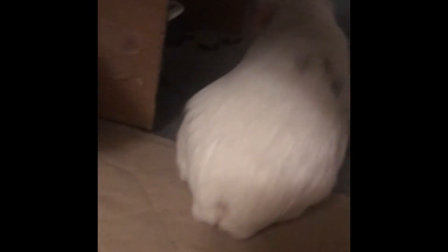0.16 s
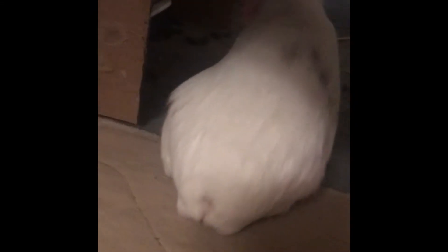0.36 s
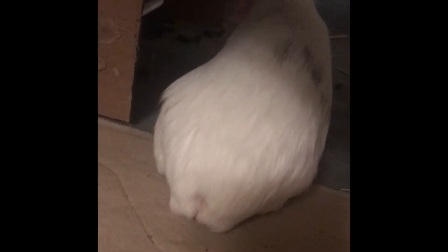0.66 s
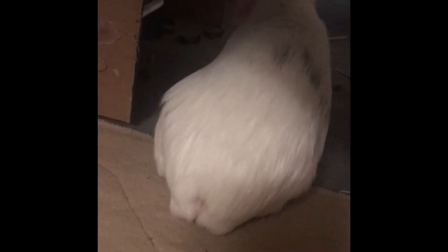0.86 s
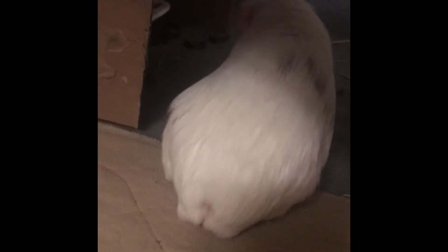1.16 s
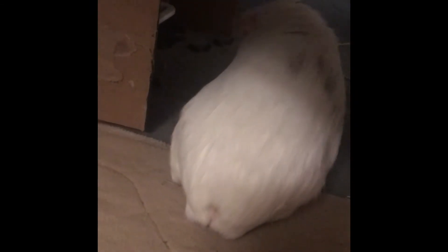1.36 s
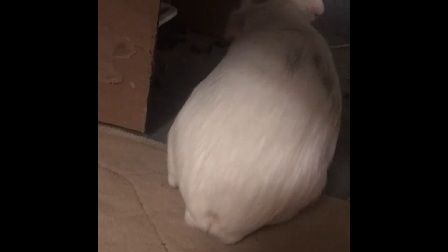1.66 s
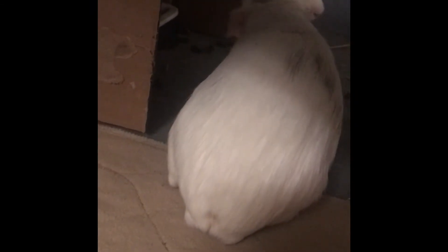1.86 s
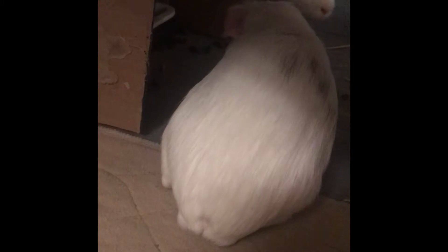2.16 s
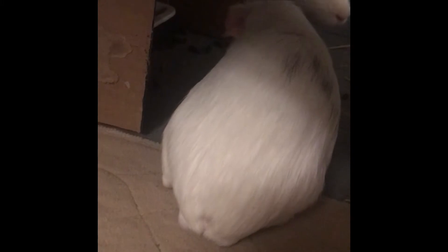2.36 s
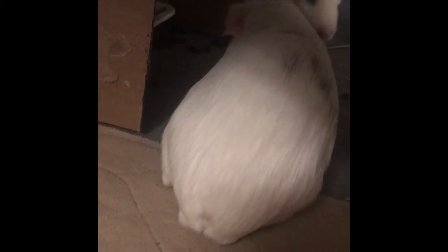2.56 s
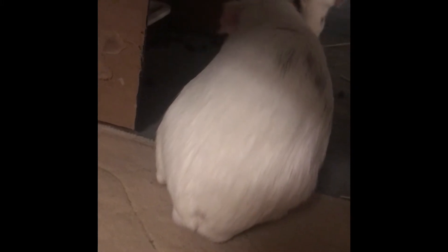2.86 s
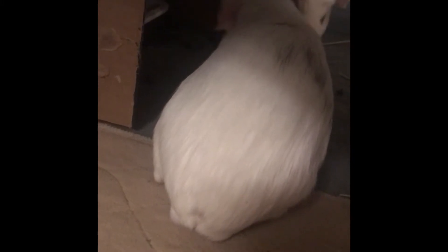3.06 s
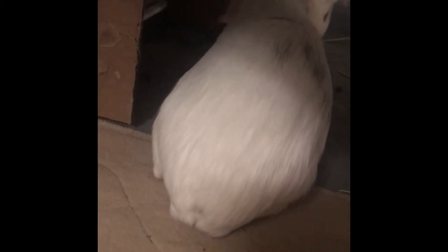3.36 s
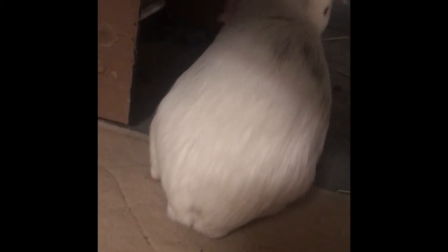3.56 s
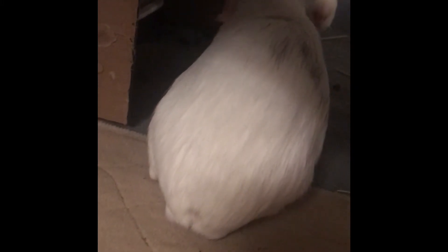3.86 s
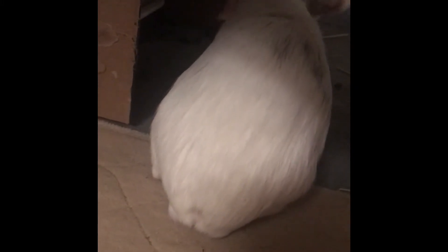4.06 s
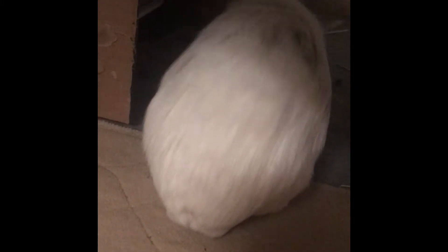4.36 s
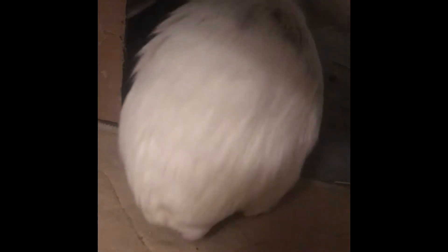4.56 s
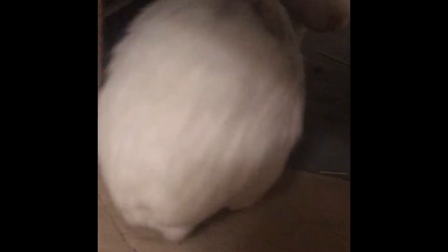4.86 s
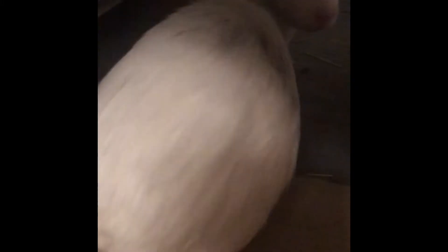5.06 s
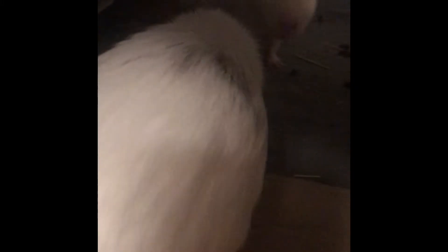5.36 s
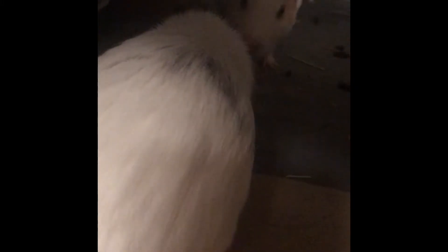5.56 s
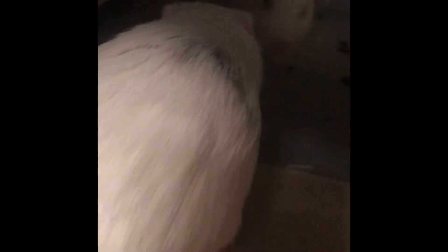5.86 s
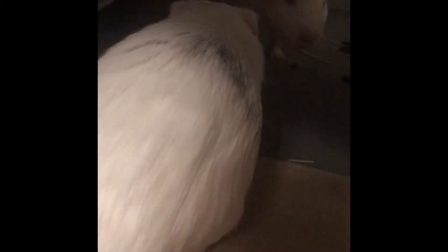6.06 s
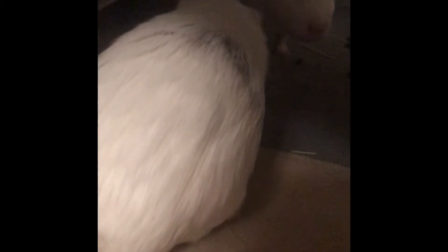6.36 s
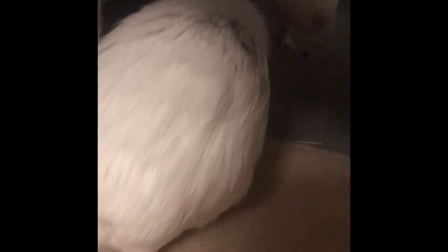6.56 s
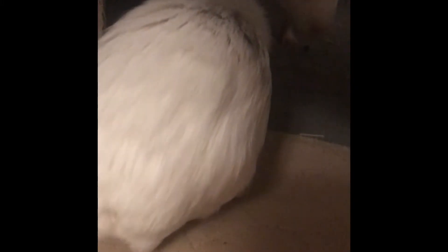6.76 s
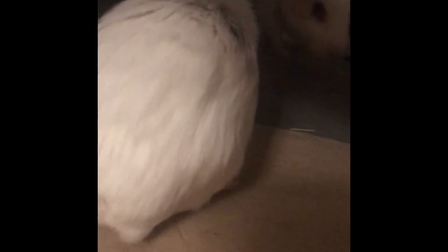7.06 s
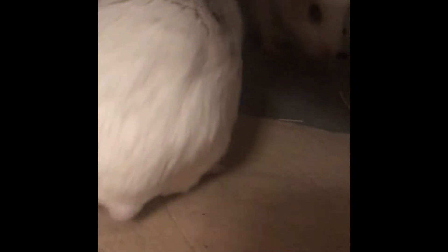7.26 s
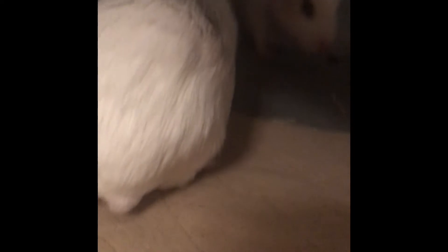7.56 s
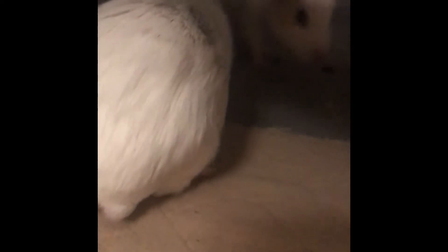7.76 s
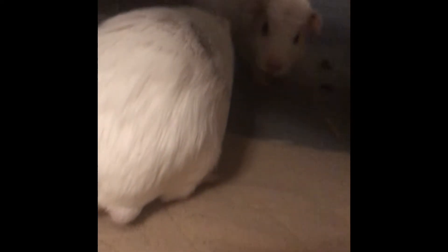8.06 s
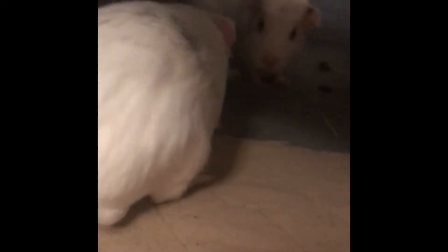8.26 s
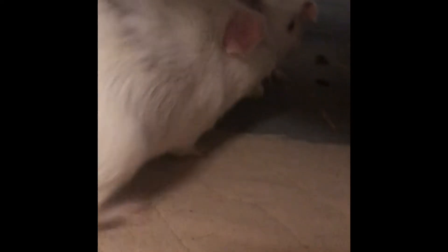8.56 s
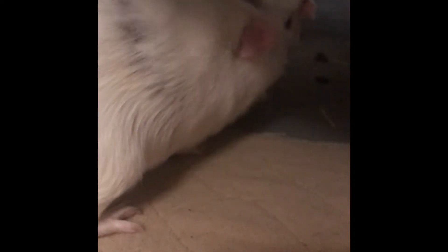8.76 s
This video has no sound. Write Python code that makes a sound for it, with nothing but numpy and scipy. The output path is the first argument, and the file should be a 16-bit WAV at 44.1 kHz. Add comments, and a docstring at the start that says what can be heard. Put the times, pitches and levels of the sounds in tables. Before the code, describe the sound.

Close rat squeaks, low whines cracking into high wavering whistles, repeat over scuffing feet, small clicks and soft fur brushes in a quiet room.

```python
"""Two pet rats on a sheet of cardboard in a small room; one protests in a long run of squeaks.
A quiet rumble and tiny fidgets run throughout; a soft peep comes first, then scuffing feet.
The squeaks begin: most start as a low clear whine, crack into a rasp and slide up thin and high.
Claws tick and paws thump between them, some calls waver on in a whistle, and later fur brushes past.
Calls are pulses ringing in a throat, paw blows ring damped modes, the rest is shaped noise."""
import sys
import numpy as np
from scipy import signal
from scipy.fft import rfft, irfft, next_fast_len
from scipy.io import wavfile
from scipy.ndimage import uniform_filter1d

SR = 44100
rng = np.random.default_rng(int(sys.argv[2]) if len(sys.argv) > 2 else 0)


def inscribe(sig):
    """Save sig as 16-bit PCM at rate SR to the path in sys.argv[1].

    A 1-D sig is mono; a 2-D sig holds one channel per row.
    Samples are clipped to [-1, 1] before scaling.
    """
    pcm = np.round(np.clip(np.atleast_2d(sig).T, -1, 1) * 32767)
    wavfile.write(sys.argv[1], SR, pcm.astype(np.int16))


N = 392931
TIME = np.arange(N) / SR
CUTOFF_HZ = 15900   # top of the sound


def from_db(db):
    """Decibels to gain."""
    return 10 ** (np.asarray(db) / 20)


def rms_one(x):
    """Scale to unit power."""
    return x / np.sqrt(np.mean(x ** 2) + 1e-20)


def soften(x, seconds):
    """Round off corners with two running means."""
    size = max(int(seconds * SR), 1)
    return uniform_filter1d(uniform_filter1d(x, size), size)


def coloured(x, spectrum):
    """Causal (minimum-phase) filter that follows a list of (Hz, dB)."""
    size = 2 * next_fast_len(N // 2 + SR // 10)
    hz, db = np.transpose(spectrum)
    bins = np.maximum(np.arange(size // 2 + 1) * SR / size, 1)
    gain = from_db(np.interp(np.log(bins), np.log(hz), db))
    # fold the cepstrum onto positive time, so that nothing rings before its cause
    cepstrum = irfft(np.log(gain))
    cepstrum[1:size // 2] *= 2
    cepstrum[size // 2 + 1:] = 0
    return irfft(np.exp(rfft(cepstrum)) * rfft(x, size))[:N]


def noise(spectrum):
    """Noise of a given colour, rms 1."""
    return rms_one(coloured(rng.standard_normal(N), spectrum))


def wobble(hz):
    """Random motion, mostly slower than hz, rms 1."""
    lowpass = signal.butter(2, hz, fs=SR, output="sos")
    return rms_one(signal.sosfilt(lowpass, rng.standard_normal(N)))


def impulses(times, levels_db):
    """A single click at each time."""
    hits = np.zeros(N)
    hits[(times * SR).astype(int)] = from_db(levels_db)
    return hits + 1e-18   # the tiny offset keeps the decaying filters fast


def bursts(times, levels_db, fade_s):
    """Envelope that jumps at each time and dies away exponentially."""
    return signal.lfilter([1], [1, -np.exp(-1 / (fade_s * SR))], impulses(times, levels_db))


def strike(times, levels_db, modes, contact_s, spread_db=2):
    """Soft blows set each mode ringing with a strength of its own."""
    out = np.zeros(N)
    for k, (hz, db, t60) in enumerate(modes):
        strengths_db = levels_db + db + spread_db * rng.standard_normal(len(times))
        decay = from_db(-60 / (t60 * SR))
        angle = 2 * np.pi * hz / SR
        resonator = [0, np.sin(angle)], [1, -2 * decay * np.cos(angle), decay * decay]
        out += (-1) ** k * signal.lfilter(*resonator, impulses(times, strengths_db))
    return soften(out, contact_s)


def glide(t, s, y):
    """Smooth curve through the points (s, y) that never overshoots them."""
    slope = np.diff(y) / np.diff(s)
    a, b = slope[:-1], slope[1:]
    # flat at each turning point, elsewhere the harmonic mean of the slopes on both sides
    inner = np.where(a * b > 0, 2 * a * b / (a + b + 1e-9), 0)
    tangent = np.r_[slope[0], inner, slope[-1]]
    i = np.clip(np.searchsorted(s, t) - 1, 0, len(slope) - 1)
    u = (t - s[i]) / np.diff(s)[i]
    bend = (1 - u) * (tangent[i] - slope[i]) - u * (tangent[i + 1] - slope[i])
    return y[i] + (t - s[i]) * (slope[i] + (1 - u) * bend)


def samples(start, length):
    """The samples of an event, and the time since it began."""
    span = np.arange(int(start * SR), min(int((start + length) * SR), N))
    return span, (span - span[0]) / SR


def progress(t, start, length):
    """Goes from 0 to 1 over a stretch of time."""
    return np.clip((t - start) / max(length, 1e-4), 0, 1)


def swell(start, length):
    """Envelope of a stroke: it rises and falls as half a sine."""
    return np.sin(np.pi * progress(TIME, start, length))


# Colour of the room's background. Each row: frequency in Hz, relative density in dB per Hz.
ROOM_AIR = [(20, -13), (55, 2.5), (130, -2), (300, -10.5), (500, -14), (900, -17), (1300, -14.5),
            (2200, -24.5), (3000, -21.5), (5000, -27), (10400, -30)]


def room_air(level_db=-64):
    """Steady noise, heaviest in the bass: the quiet rumble of the room with a little hiss."""
    return from_db(level_db) * noise(ROOM_AIR)


# Colour of scraped cardboard. Each row: frequency in Hz, relative density in dB per Hz.
SCRAPE = [(300, -28), (600, 2.5), (1200, 6), (2200, -3), (6500, -2.5), (10000, -14), (16000, -15)]
# Colour of the shaken sheet. Each row: frequency in Hz, relative density in dB per Hz.
RUMBLE = [(20, -40.5), (55, 8.5), (90, 1), (200, -8.5), (380, -10.5), (900, -55)]


def fidgets(count=45, level_db=-72, range_db=7, thud_db=4):
    """Small shifts of weight give faint scratches and thuds all along."""
    s = rng.uniform(0, TIME[-1], count)
    db = level_db + range_db * rng.random(count)
    scratch = soften(bursts(s, db, fade_s=0.0063), .002) * noise(SCRAPE)
    thud = soften(bursts(s, db + thud_db, fade_s=0.051), 0.007) * noise(RUMBLE)
    return scratch + thud


# Short soft peeps. Each row: start in seconds, length in seconds, first, middle and last pitch in Hz,
# level in dB, rasp from 0 to 1.
PEEPS = [(0.285, 0.061, 773, 718.6, 652, -47, 0.14), (.352, 0.022, 1298, 1081, 883, -47, 0.3),
         (0.611, .034, 1150, 1102, 1287, -45, 0.54), (1.237, 0.056, 670, 641, 672, -48, 0.2),
         (1.3, 0.022, 1030, 852, 772, -48.5, 0.23), (5.736, .019, 1924, 2729, 3310, -46, 0.3),
         (7.083, 0.015, 2249, 1800, 1553, -47, 0.21), (7.109, .015, 2350, 2780, 3120, -63.5, 0.01)]


def peep(start, length, first_hz, middle_hz, last_hz, db, roughness):
    """One small arc of pitch at an even level."""
    span, t = samples(start, length)
    hz = glide(t / length, np.array([0, .5, 1]), np.array([first_hz, middle_hz, last_hz]))
    return span, hz, from_db(db), 0, roughness


CRACK_TOP_HZ = 2520   # above this pitch the voice is a clean whistle again


def voice_controls(edge_s=.0025):
    """Pitch, loudness, pulse alternation and rasp at every sample; one voice makes all the calls."""
    pitch, loudness, doubling, rasp = np.zeros((4, N))
    calls = [squeak(*row) for row in SQUEAKS]
    calls += [wavering_stretch(*row) for row in WAVERING]
    calls += [peep(*row) for row in PEEPS]
    for span, *controls in calls:
        pitch[span], loudness[span], doubling[span], rasp[span] = controls
    # bridge the silences so that the pitch never jumps to zero
    pitch = np.interp(TIME, TIME[pitch > 0], pitch[pitch > 0])
    can_crack = pitch < CRACK_TOP_HZ
    return [soften(control, edge_s) for control in (pitch, loudness, doubling * can_crack, rasp * can_crack)]


# Resonance of throat and mouth. Each row: frequency in Hz, gain in dB.
THROAT = [(280, 3), (450, -1), (660, 0), (900, -2), (1220, 5), (1450, -0.5), (1720, -8.5), (2080, -11),
          (2300, -17.5), (2600, -14.5), (3560, -23.5), (4100, -47), (5000, -50), (6000, -39.5),
          (7400, -48.5), (10000, -55)]
# Brightness of the voice over time. Each row: time in seconds, gain of its upper overtones in dB.
BRIGHTNESS = [(4.4, -2), (5.2, -5.5), (6.05, -3), (7, -4.5), (8.2, -2)]


def fold_pulses(phase, pitch, loudness, firm_db=-38, dulling=0.066, flicker_db=3.5):
    """One pulse a cycle; pushed gently, the folds close softly and the overtones fade."""
    hz, db = np.transpose(THROAT)
    # effort is the loudness without the help of the throat
    effort_db = 20 * np.log10(loudness + 1e-6) - np.interp(pitch, hz, db)
    softness = dulling * np.maximum(firm_db - effort_db, 0)
    brightness_db = np.interp(TIME, *np.transpose(BRIGHTNESS))
    pulses = np.cos(phase)
    for k in range(2, 15):
        overtone_db = brightness_db * (k > 2) + flicker_db * wobble(30)
        weight = np.exp(-softness * (k - 1)) * from_db(overtone_db)
        pulses = pulses + weight * np.cos(k * phase) * (k * pitch < CUTOFF_HZ)
    return pulses


# Hiss of air forced through the mouth. Each row: frequency in Hz, relative density in dB per Hz.
MOUTH_HISS = [(1500, 0.5), (3100, 16), (4200, -34), (5000, -34), (5800, 8.5), (7400, 1), (8300, -12.5),
              (15000, -19)]
TRIPLE_HZ = 1456   # above this pitch a cracked voice groups its pulses in threes instead of pairs


def rat_voice(rasp_shimmer=0.7, rasp_air=0.2, clear_air=0.0023, flutter_db=4, sputter_db=4,
              crack_swing_db=3, hiss_db=-34, strain_hz=1400, level_db=1.43):
    """Vocal-fold pulses ring in the throat; in a crack they bunch, sputter and lose their timing."""
    pitch, loudness, doubling, rasp = voice_controls()
    strain = pitch / strain_hz   # tight folds are less steady and leak more air
    jitter = .008 * wobble(70) + (.008 * strain + .13 * rasp) * wobble(280)
    pitch = pitch * (1 + jitter)
    phase = 2 * np.pi * np.cumsum(pitch) / SR

    # every second or third pulse differs in strength and timing
    in_threes = soften((pitch > TRIPLE_HZ).astype(float), .002)
    grouping = (1 - in_threes) * np.cos(phase / 2) + in_threes * np.cos(phase / 3)
    alternation = doubling * from_db(crack_swing_db * wobble(36)) * grouping
    phase = phase + .7 * alternation
    pulses = fold_pulses(phase, pitch, loudness)
    strength = 1 + alternation + rasp_shimmer * rasp * wobble(540)

    # air hisses through the folds while they are open
    opening = 1 + np.cos(phase)
    air = (clear_air + rasp_air * rasp) * opening * rng.standard_normal(N)
    voice = coloured(pulses * strength + air, THROAT)

    # even out the level, then let the rasp flutter and sputter
    voice = voice / np.sqrt(soften(voice ** 2, 0.0076) + 1e-12)
    voice = voice * from_db(rasp * (flutter_db * wobble(270) + sputter_db * wobble(80)))
    hiss = from_db(hiss_db) * strain * (1 + 2 * rasp) * opening * noise(MOUTH_HISS)
    return from_db(level_db) * loudness * (voice + hiss)


# Feet scuffing the cardboard. Each row: start in seconds, length in seconds, scrape level in dB,
# rumble level in dB.
SCUFFS = [(0.378, 0.21, -50.5, -46.5), (0.566, 0.15, -50.5, -44.5), (0.67, 0.18, -68, -57),
          (0.831, 0.11, -61, -53), (0.893, 0.38, -61, -55), (1.211, 0.25, -71, -58),
          (1.515, 0.2, -81, -50.5)]


def scuffle(grain_db=5):
    """Sliding feet scrape in grains and shake the sheet."""
    scrape = sum(from_db(db) * swell(start, length) for start, length, db, _ in SCUFFS)
    rumble = sum(from_db(db) * swell(start, length) for start, length, _, db in SCUFFS)
    grainy = rms_one(noise(SCRAPE) * from_db(grain_db * wobble(83)))
    return scrape * grainy + rumble * noise(RUMBLE)


# Squeaks. Each row: start, fall, climb and slide in seconds, onset, lowest and end pitch in Hz,
# lateness of the climb as an exponent, waver in octaves, effort in the whine, at the break and at the
# end in dB, time until the crack in seconds, long-short pulse alternation from 0 to 1, rasp from 0 to 1.
SQUEAKS = [ (.417, 0.029, 0.069, 0.0043, 780.3, 708, 1220, 1.83, 0, -46, -47.5, -53, .055, 0.03, 0.32),
           (0.832, 0.014, 0.054, 0.014, 700, 695.6, 1153, 16.6, 0, -43, -49.5, -61, 0.048, 0.12, 0.67),
           (0.962, .02, 0.038, 0.024, 725, 714, 850, 12, 0, -45.5, -48, -50, 0.0075, 0.12, .2),
           (1.59, 0.029, 0.068, 0.017, 780, 704, 1710, 1.7, 0.033, -39.5, -39, -36, .2, 0.05, 0.01),
           (2.018, 0.0088, 0.088, 0.044, 679, 645, 1746, 3.03, 0.3, -39, -41, -38.5, 0.13, 0.1, 0.34),
           (2.572, 0.021, 0.059, 0.024, 690, 640.4, 1800, 7.8, 0.2, -38, -39.5, -45, 0.061, 0.08, 0.14),
           (2.84, 0.049, .014, 0.013, 1405, 703, 2050, 2.64, 0.0097, -37.5, -39, -33, 0.12, 0.17, 0),
           (3.149, 0.018, 0.066, 0.019, 696, 630, 1408, 6.1, 0, -39.5, -40, -47, 0.084, 0.06, 0.41),
           (3.819, 0.029, 0.054, 0.032, 695, 582, 1498, 3.45, 0.29, -38.5, -42, -40.5, 0.061, 0.16, 0.32),
           (4.358, 0.036, 0.082, 0.028, 842, 570, 1600, 3.46, 0, -34.5, -37, -40, 0.085, 0.33, 0.14),
           (4.707, 0.027, 0.08, 0.052, 878, 655, 1797, 5.1, 0.0083, -31.5, -39, -41, 0.07, 0.28, 0.29),
           (5.127, 0.024, 0.07, .038, 855, 691, 2450, 6.1, 0.13, -32.5, -37.5, -37, 0.085, 0.17, 0.22),
           (5.567, 0.024, 0.063, 0.092, 751, 663, 1948, 4.7, 0.19, -31.5, -36.5, -38, 0.077, 0.33, 0.1),
           (6.022, 0.027, 0.08, 0.035, 713, 606.7, 1676, 3.03, 0.031, -32.5, -40.5, -41.5, 0.09, 0.12, 0.28),
           (6.614, .032, .075, .024, 900, 636, 1444, 5.9, 0.0033, -33.5, -40, -33.5, 0.083, 0.2, 0.23),
           (6.944, 0.033, 0.074, 0.021, 801, 663, 1907, 5.5, 0.019, -34, -40.5, -32, 0.1, 0.24, 0.22),
           (7.285, 0.031, 0.075, 0.041, 755, 660, 1416, 2.06, 0, -34, -50, -40.5, 0.094, 0.29, 0.41),
           (7.893, 0.027, 0.078, 0.038, 741, 632, 2203, 2.46, 0.11, -36.5, -47.5, -35, 0.067, 0.3, 0.17),
           (8.13, 0.047, 0.12, 0.068, 1653, 652, 2795, 5.5, 0.38, -37.5, -42, -35.5, 0.11, 0.33, 0.17),
           (8.554, 0.031, .025, 0.013, 826, 615, 1360, 3.06, 0.0052, -33, -39.5, -49, 0.078, 0.1, 0.07),
           (8.639, 0.047, 0.09, 0.014, 956, 603, 2102, 14.2, 0.018, -36, -39.5, -24, 0.029, 0.4, 0.08)]
# How loudly the mouth carries each pitch of a squeak. Each row: pitch in Hz, gain in dB.
CARRY = [(600, 1.5), (690, 0), (900, -2.5), (1200, 4.5), (1420, 0), (1720, -5), (2000, -7.5), (2300, -11),
         (2850, -13), (3400, -5)]
BREAK_HZ = 1188   # the voice breaks here, on the mouth's main resonance
FALL_EXPONENT, CREEP_SHARE, SLIDE_EXPONENT = 2.7, .11, .75   # drop eases out, whine creeps up, slide flattens
CRACK_JUMP = .9   # a deep crack makes the pitch jump part of the way to the break
WAVER_S = 0.032   # one waver of the slide
SWELL_DB, SWELL_S, RELEASE_S = 4.5, 0.051, 0.0079   # softer start that swells, quick fade at the end


def squeak(start, fall_s, climb_s, slide_s, onset_hz, low_hz, end_hz, lateness, waver,
           whine_db, break_db, end_db, clear_s, depth, roughness):
    """Fall, climb and slide; the level follows the effort and how well the mouth carries the pitch."""
    break_s = fall_s + climb_s
    span, t = samples(start, break_s + slide_s)
    fall = progress(t, 0, fall_s)
    climb = progress(t, fall_s, climb_s)
    slide = progress(t, break_s, slide_s)
    cracked = t > clear_s

    hz = low_hz * (onset_hz / low_hz) ** ((1 - fall) ** FALL_EXPONENT)
    risen = CREEP_SHARE * climb + (1 - CREEP_SHARE) * climb ** lateness
    jump = CRACK_JUMP * depth * cracked * climb * (1 - risen)
    hz *= (BREAK_HZ / low_hz) ** (risen + jump)
    hz *= (end_hz / BREAK_HZ) ** (slide ** SLIDE_EXPONENT)
    hz *= 2 ** (-waver * np.sin(np.pi * slide * slide_s / WAVER_S) ** 2)

    effort_db = whine_db + (break_db - whine_db) * climb ** 2 + (end_db - break_db) * slide
    effort_db = effort_db - SWELL_DB * np.exp(-t / SWELL_S)
    carry_db = np.interp(hz, *np.transpose(CARRY))
    gain = from_db(effort_db + carry_db) * progress(t[-1] - t, 0, RELEASE_S)
    return span, hz, gain, depth * cracked, roughness * cracked


# Claw ticks. Each row: time in seconds, snap level in dB, crunch against the snap in dB.
TICKS = [(0.418, -51.5, 6), (0.626, -42, 3), (0.644, -57, 14.5), (1.364, -50, 1), (4.7008, -58.5, 4),
         (5.1643, -45, -3.5), (5.3688, -58, 1), (7.3454, -52, 3), (7.3761, -53, 7), (7.4008, -46.5, -19),
         (7.4456, -51.5, -2), (7.5942, -47, 4.5), (7.6234, -46.5, -12), (7.664, -39.5, -13.5),
         (7.84, -49.5, -3), (8.0635, -43.5, -4), (8.476, -63.5, 8)]
# Bright colour of the claw. Each row: frequency in Hz, relative density in dB per Hz.
TICK_COLOUR = [(2000, -29), (4500, -5), (7500, 1), (10000, 3), (16000, -4.5)]
# Duller colour of the board under it. Each row: frequency in Hz, relative density in dB per Hz.
TICK_BODY = [(200, -9.5), (900, -13), (2500, -16), (4500, -25.5), (9000, -43)]


def ticks(splinter_db=-16, grain_db=6):
    """A claw gives a bright snap, a few finer crackles and a duller crunch of the board under it."""
    s, db, crunch_db = np.transpose(TICKS)
    grains = rms_one(from_db(grain_db * wobble(250)))
    crackle = soften(bursts(s, db + splinter_db, fade_s=0.013), 0.015) * grains
    snap = soften(bursts(s, db, fade_s=0.0029), 0.00034)
    crunch = soften(bursts(s, db + crunch_db, fade_s=0.0094), 0.0018)
    return (snap + crackle) * noise(TICK_COLOUR) + crunch * noise(TICK_BODY)


# Paws landing on the cardboard. Each row: time in seconds, thud level in dB,
# hollow knock against the thud in dB.
STEPS = [(0.5, -27, -20), (0.648, -41, 4.5), (0.844, -33.5, 3.5), (0.943, -38, 9), (0.955, -42, 5),
         (1.014, -44, 10.5), (1.085, -46, 9.5), (1.144, -38, -5), (1.344, -49.5, 10.5), (1.429, -47.5, 0),
         (1.516, -42.5, 8.5), (2.358, -46.5, -2), (2.762, -40, -8), (4.245, -50, -3), (4.434, -48.5, -22),
         (5.048, -40.5, -9), (5.232, -45.5, -12), (8.654, -39, -8)]
# Deep modes of the cardboard floor. Each row: frequency in Hz, level in dB, 60 dB decay in seconds.
THUD_MODES = [(69, 2, 0.089), (102.2, 3, 0.1), (139, 2, 0.17)]
# Hollow modes of the cardboard floor. Each row: frequency in Hz, level in dB, 60 dB decay in seconds.
KNOCK_MODES = [(195.3, 1.5, 0.033), (247, 0.5, 0.04), (347, 1, 0.026), (500, -3.5, 0.011),
               (660, -6.5, 0.024)]


def steps(knock_db=1):
    """Paws press a dull thud and a hollow knock out of the cardboard."""
    s, db, hollow_db = np.transpose(STEPS)
    thud = strike(s, db, THUD_MODES, contact_s=0.0036)
    knock = strike(s, db + hollow_db + knock_db, KNOCK_MODES, contact_s=0.00061)
    return thud + knock


# Wavering stretches of the calls: thin tails of squeaks and parts of longer whistles.
# Each row: pulse alternation from 0 to 1, rasp from 0 to 1,
# and a curve of points: time in seconds, pitch in Hz, level in dB.
WAVERING = [ (0.028, 0.045, [(1.7, 1710, -36), (1.712, 1634, -49), (1.728, 2050, -46), (1.742, 2020, -49),
            (1.75, 2010, -83)]), (0, 0.013, [(2.16, 1574, -38), (2.172, 1860, -49.5), (2.188, 2050, -46),
            (2.2, 2240, -60), (2.214, 1730, -50), (2.228, 2025, -49.5), (2.24, 2370, -65)]),
            (0.017, 0.09, [(2.675, 1776, -38), (2.681, 1944, -48.5), (2.695, 1687, -49.5),
            (2.715, 1970, -48.5), (2.735, 2880, -65)]), (0.014, 0.019, [(3.255, 1414, -42),
            (3.267, 1704, -46), (3.283, 1290, -41), (3.297, 1344, -38), (3.309, 1796, -54),
            (3.321, 1582, -44.5), (3.335, 1747, -47.5), (3.351, 1321, -39), (3.369, 1586, -44),
            (3.381, 1557, -41.5), (3.393, 1854, -49), (3.4, 1832, -41)]), (0.01, 0.02, [(3.4, 1770, -63),
            (3.41, 1788, -43), (3.422, 2253, -54.5), (3.44, 1837, -48), (3.483, 1590, -41.5),
            (3.496, 1450, -37), (3.508, 1464, -41)]), (.1, .09, [(3.508, 1450, -44), (3.516, 1400, -42),
            (3.522, 1246, -36), (3.558, 1270, -37), (3.572, 1574, -39.5), (3.612, 2052, -51.5)]),
            (.19, .12, [(4.042, 1570, -45.5), (4.068, 1485, -40), (4.107, 1122, -37), (4.125, 1049, -38),
            (4.14, 1277, -39.5), (4.172, 1168, -33.5), (4.196, 2480, -49.5), (4.216, 2920, -48),
            (4.228, 2974, -63)]), (0.092, 0.0545, [(4.49, 1546, -39), (4.503, 2410, -45.5),
            (4.513, 2450, -49), (4.522, 2840, -42), (4.539, 2966, -40.5), (4.548, 3250, -44)]),
            (0.0067, 0.017, [(4.865, 2450, -34), (4.873, 2853, -46), (4.901, 2676, -46),
            (4.913, 2370, -44.5), (4.931, 2897, -47), (4.955, 2600, -44.5), (4.977, 2630, -41),
            (4.985, 2940, -47), (4.992, 3060, -51)]), (0.021, 0.017, [(5.258, 2353, -38),
            (5.266, 2360, -42), (5.276, 2900, -48), (5.29, 2985, -45), (5.298, 2960, -73)]),
            (.2, .22, [(6.16, 1702, -50), (6.174, 1639, -42.5), (6.188, 2175, -48.5), (6.198, 1687, -47.5),
            (6.208, 1865, -47), (6.228, 1638, -42.5), (6.24, 2566, -52.5), (6.254, 2088, -48),
            (6.268, 2598, -49), (6.28, 2098, -52)]), (0.011, 0.08, [(6.28, 1910, -46), (6.294, 2010, -46.5),
            (6.318, 1293, -36), (6.352, 1098, -31)]), (.14, .05, [(6.352, 1020, -38.5),
            (6.396, 1003, -37.5), (6.418, 1302, -33.5), (6.444, 1308, -34.5), (6.464, 1171, -30),
            (6.476, 1402, -35.5), (6.49, 1380, -33), (6.505, 1705, -42)]), (.16, .12, [(7.482, 2142, -48),
            (7.507, 1946, -45)]), (0.032, 0.027, [(7.507, 1918, -55), (7.515, 1940, -49),
            (7.547, 1247, -37), (7.591, 1170, -36), (7.633, 1143, -39), (7.655, 1204, -37),
            (7.669, 1650, -42), (7.687, 1333, -36.5), (7.702, 1350, -37)]),
            (.13, .17, [(8.035, 2456, -38.5), (8.041, 2466, -58), (8.051, 1917, -50), (8.073, 2140, -52),
            (8.087, 1705, -47), (8.103, 1620, -45.5), (8.119, 1865, -47.5), (8.135, 1470, -38)])]


def wavering_stretch(depth, roughness, curve):
    """Part of a call whose pitch and level glide through the points of a curve."""
    s, hz, db = np.transpose(curve)
    span, t = samples(s[0], s[-1] - s[0])
    return span, glide(s[0] + t, s, hz), from_db(glide(s[0] + t, s, db)), depth, roughness


# Fur brushing past. Each row: start in seconds, length in seconds, level in dB.
BRUSHES = [(4.076, 0.66, -64), (5.007, 0.17, -61.5), (5.333, 0.11, -66), (7.354, 0.095, -61.5),
           (7.546, 0.13, -57), (8.329, 0.12, -60.5), (8.513, 0.2, -60)]
# Colour of the fur. Each row: frequency in Hz, relative density in dB per Hz.
FUR = [(1500, 11), (4000, 3.5), (6500, 3), (10000, 3.5), (16000, -1.5)]


def brushes(grain_db=3.5):
    """Moving fur makes a soft high hiss that swells and fades."""
    level = sum(from_db(db) * swell(start, length) for start, length, db in BRUSHES)
    return level * rms_one(noise(FUR) * from_db(grain_db * wobble(120)))


def room(x, t60=0.15, wet_db=-26):
    """Faint diffuse reflections of a furnished room: a decaying noise tail after a 4 ms gap."""
    t = TIME[:SR // 2]
    tail = rng.standard_normal(len(t)) * from_db(-60 * t / t60) * (t > .004)
    reflections = signal.fftconvolve(x, tail / np.linalg.norm(tail))[:N]
    return x + from_db(wet_db) * reflections


def scene():
    """The animals close by, the room's rumble and hiss behind them."""
    animals = fidgets() + rat_voice() + scuffle() + ticks() + steps() + brushes()
    return (room(animals) + room_air())[None]


def record(dry, low_cut_hz=47):
    """A small microphone loses the deep bass; the top is cut steeply."""
    bass_cut = signal.butter(2, low_cut_hz, "high", fs=SR, output="sos")
    top_cut = signal.ellip(12, .1, 80, CUTOFF_HZ, fs=SR, output="sos")
    return signal.sosfilt(top_cut, signal.sosfilt(bass_cut, dry))


dry = scene()
out = record(dry)
inscribe(out)
```